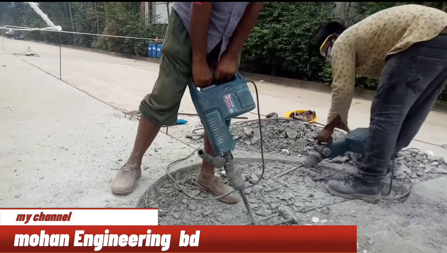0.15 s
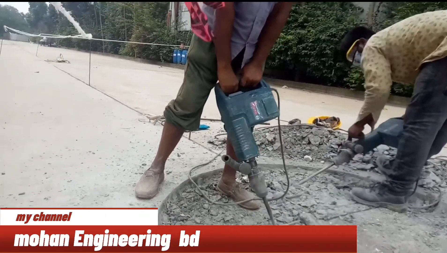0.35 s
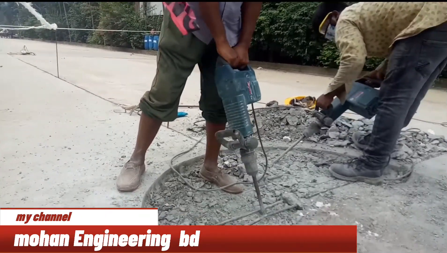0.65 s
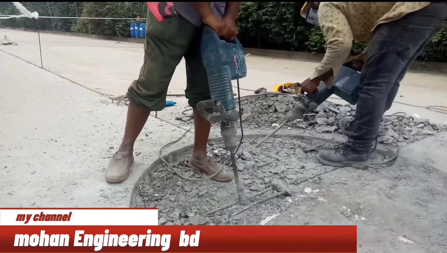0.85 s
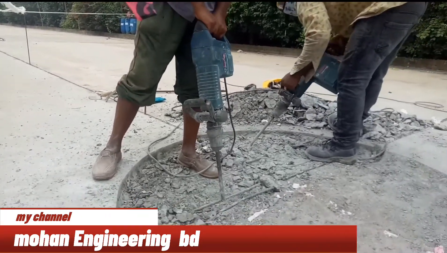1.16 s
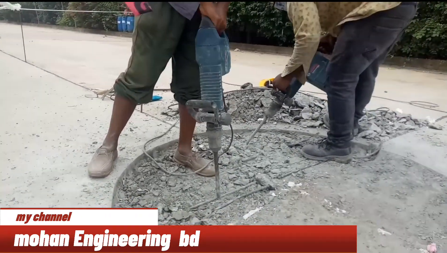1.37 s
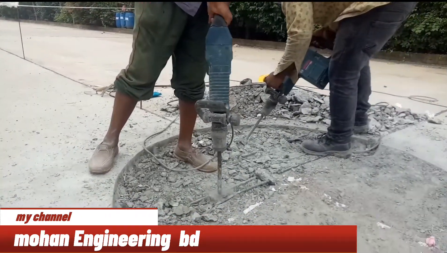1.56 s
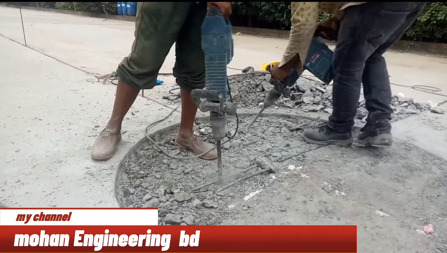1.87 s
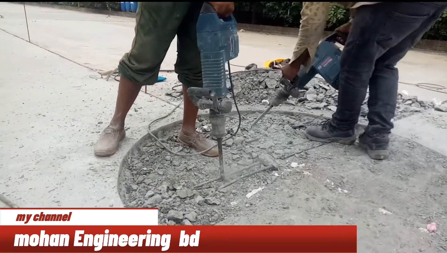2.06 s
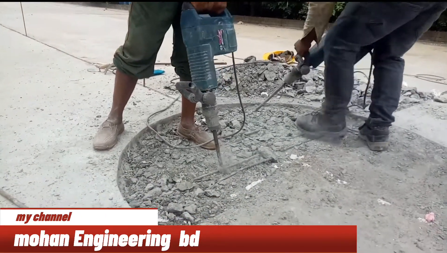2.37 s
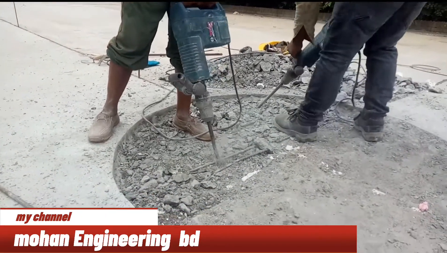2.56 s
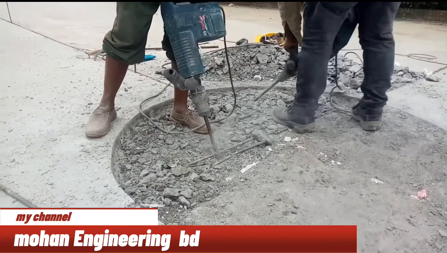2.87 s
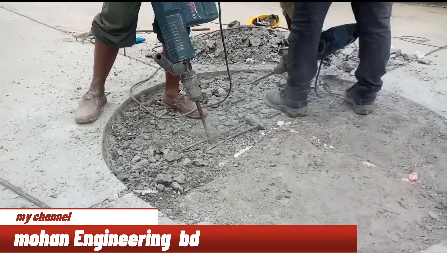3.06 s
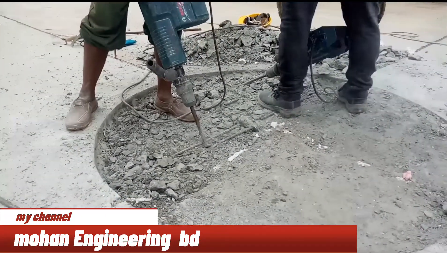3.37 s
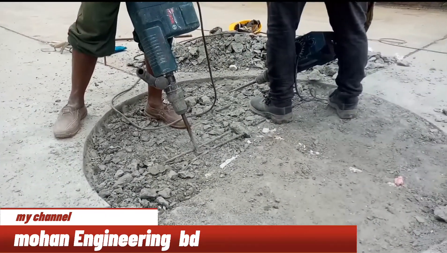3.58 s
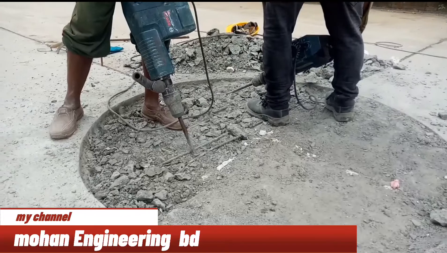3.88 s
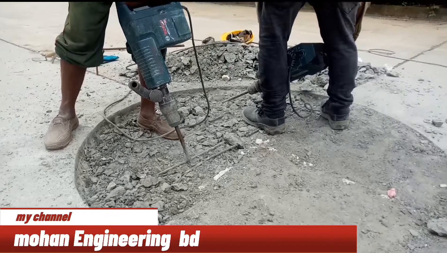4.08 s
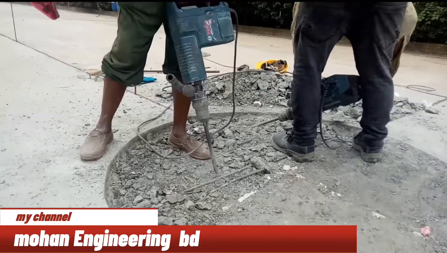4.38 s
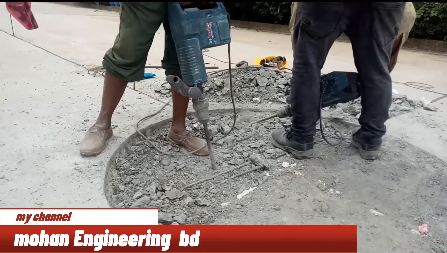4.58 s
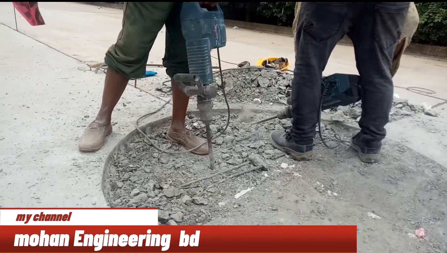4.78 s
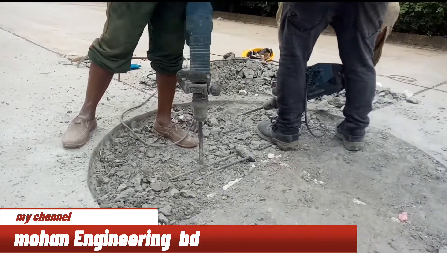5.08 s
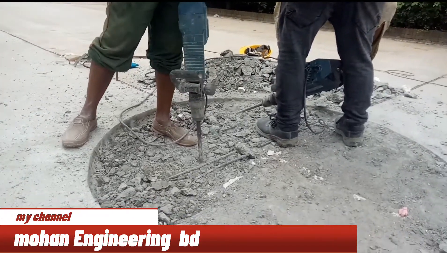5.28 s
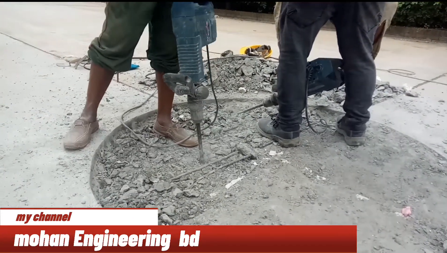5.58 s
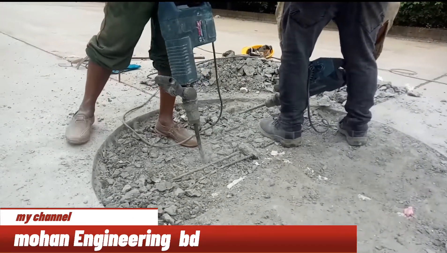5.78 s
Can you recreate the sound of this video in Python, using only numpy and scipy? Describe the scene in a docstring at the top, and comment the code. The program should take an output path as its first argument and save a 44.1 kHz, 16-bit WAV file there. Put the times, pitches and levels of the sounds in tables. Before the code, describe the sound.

A close demolition hammer pounds a concrete road about thirty times a second under a hard gear whine, while a second hammer rattles farther off.

```python
"""Close gear whine and hard blows: a demolition hammer chisels a concrete road, a second one works farther off.
Each crank turn squeezes the air spring and loads the gears, so their teeth whine (harmonics of the mesh pitch).
Each blow rings slab and chisel modes; noise bursts make grit cracks and casing sizzle. Lifted, blows are faint.
Behind: a loose chisel's high rings, motor and fan noise, brush tone, deep rumble, short echo of the hammers.
Two unequal microphone ports, the left mostly louder, clip at full scale."""
import sys
import numpy as np
from scipy import signal
from scipy.fft import rfft, irfft, next_fast_len
from scipy.io import wavfile
from scipy.ndimage import uniform_filter1d

SR = 44100
rng = np.random.default_rng(int(sys.argv[2]) if len(sys.argv) > 2 else 0)


def pcm_store(signal):
    """Save signal as 16-bit PCM."""
    levels = np.round(np.clip(np.atleast_2d(signal), -1, 1) * 32767)
    wavfile.write(sys.argv[1], SR, levels.astype(np.int16).T)


N = 261954
FFT_SIZE = next_fast_len(N)
RING_SCATTER_DB = 3.5


def undb(db):
    """Decibels to gain."""
    return 10 ** (np.asarray(db) / 20)


def level(x, db):
    """Scale to an rms level, fixed or moving."""
    return x * undb(db) / np.sqrt(np.mean(x ** 2))


def smooth_noise(size):
    """Slow random curve: white noise averaged over size samples."""
    return uniform_filter1d(rng.standard_normal(N), size=size)


def columns(table):
    """Each column of a time curve, sample by sample."""
    s, *rest = np.transpose(table)
    return [np.interp(np.arange(N) / SR, s, c) for c in rest]


def over_hz(table):
    """A frequency curve read at every transform bin, on a log axis."""
    hz, value = np.transpose(table)
    bins_hz = np.fft.rfftfreq(FFT_SIZE, 1 / SR)
    return np.interp(np.log(bins_hz + 1), np.log(hz), value)


def bouts(table, between_db, edge_s):
    """Levels that hold during each bout and fall back between bouts."""
    t = np.arange(N) / SR
    rest_db = np.array(between_db, float)[:, None]
    total_db = rest_db
    for start_s, end_s, *db in table:
        on = np.clip(np.minimum(t - start_s, end_s - t) / edge_s + .5, 0, 1)
        total_db = total_db + on * (np.array(db)[:, None] - rest_db)
    return total_db


def strokes(turns):
    """Number of the current turn, part of it done, and an impulse at each blow (every whole turn)."""
    count = columns(turns)[0]
    which = (count - count[0] // 1).astype(int)
    blows = np.diff(which, prepend=which[0]).astype(float)
    return which, count % 1, blows


def hump(turn, at, width, edge):
    """A swell once a turn; place and width in parts of a turn, higher edge flattens its top."""
    distance = (turn - at + .5) % 1 - .5
    return np.exp(-.5 * np.abs(distance / width) ** edge)


# Likeness of the noise at the two ports. Each row: frequency in Hz, correlation from -1 to 1.
PORT_LIKENESS = [(60, -0.036), (130, 0.98), (290, 0.48), (640, 0.82), (1410, 0.34), (3100, -0.21),
                 (6820, 0.95), (15000, 0.065)]


def noise(colour):
    """Coloured noise at 0 dB rms, built from sum and difference so port likeness varies with frequency."""
    like = np.clip(over_hz(PORT_LIKENESS), -1, 1)
    spectra = rfft(rng.standard_normal((2, FFT_SIZE))) * undb(over_hz(colour))
    mid, side = spectra * np.sqrt([1 + like, 1 - like])
    return level(irfft([mid + side, mid - side], FFT_SIZE)[:, :N], 0)


def ring(blows, which, modes, scatter_db, twist_rad):
    """Decaying resonances at 0 dB rms; each blow strikes each mode with its own strength and phase."""
    out = 0
    for hz, db, t60_s in modes:
        pole = np.exp(2j * np.pi * hz / SR - np.log(1000) / (t60_s * SR))
        chance = rng.standard_normal((N // 1000, 2))[which].T
        share = undb(scatter_db * chance[0]) * np.exp(1j * twist_rad * chance[1])
        mode = signal.lfilter([1], [1, -pole], blows * share).imag
        out = out + undb(db) * mode / np.sqrt(t60_s)
    return level(out, 0)


# Near crank, slope is motor speed. Each row: time in seconds, turns counted.
NEAR_TURNS = [(-0.1, -3.32), (0.7952, 24), (1.1786, 36), (1.9705, 60), (2.3611, 72), (2.8848, 88),
              (3.0176, 92), (3.408, 104), (4.1961, 128), (5.1033, 156), (5.2339, 160), (5.3677, 164),
              (6.1, 186.26)]
# Near gears, loud while the worker leans. Each row: time in seconds, tooth mesh pitch in Hz, level in dB.
NEAR_GEARS = [(0, 1861, -9.5), (.25, 1895, -12.5), (.5, 1890, -9.5), (.63, 1850, -7.5), (.73, 1844, -18.5),
              (.84, 1886, -28), (0.981, 1840, -29.5), (1.12, 1803, -26), (1.4, 1815, -24),
              (1.67, 1812, -32), (1.8, 1769, -23.5), (1.969, 1820, -15.5), (2.29, 1855, -8),
              (2.55, 1880, -12), (2.8, 1842, -11.5), (3.1, 1861, -10), (3.3, 1910, -10.5),
              (3.45, 1868, -10.5), (4.225, 1862, -12), (4.257, 1860, -36), (4.289, 1861, -12),
              (4.321, 1867, -23.5), (5.08, 1894, -20), (5.25, 1790, -19), (5.6, 1859, -14.5),
              (5.82, 1883, -8.5), (5.94, 1906, -13)]
# Near chiselling. Each row: start in seconds, end in seconds, thud in dB, crack in dB, chisel ring in dB.
NEAR_BOUTS = [(-.1, 0.76, -19, -25.5, -27.5), (1.555, 1.826, -26, -29.5, -19),
              (1.818, 2.139, -21, -23, -15.5), (2.14, 2.449, -22, -23, -20), (2.449, 2.74, -21, -25.5, -26),
              (2.74, 3.4, -22, -23, -45), (3.406, 4.245, -21, -26.5, -39), (4.278, 4.31, -48, -43, -11.5),
              (4.314, 4.747, -39, -43, -27), (4.75, 5.13, -39, -30, -34), (5.135, 5.459, -21.5, -25, -18.5),
              (5.46, 6.098, -20.5, -22, -35)]
NEAR_LIFTED_DB = (-39.5, -46, -32)  # thud, crack, chisel ring between bouts
# Near chisel modes. Each row: frequency in Hz, relative level in dB, t60 in seconds.
NEAR_CHISEL = [(3760, 0, .07), (3810, -3, .055), (4080, -9, .03), (4950, -16, .04)]
# Slab modes under the near hammer. Each row: frequency in Hz, relative level in dB, t60 in seconds.
NEAR_SLAB = [(128, -32, 0.1), (236, -4.5, 0.039), (322, 0, 0.007), (401, -5, 0.018), (672, -2, 0.019),
             (775, -13, 0.095), (1150, -6.5, 0.04)]


def near_hammer():
    """The main hammer: gears loaded by the air spring, chisel driven into the slab."""
    return hammer(NEAR_TURNS, NEAR_GEARS, NEAR_BOUTS, NEAR_LIFTED_DB, NEAR_CHISEL, NEAR_SLAB,
                  squeeze_at=0.855, rattle_db=-24.5)


# Far crank, slope is motor speed. Each row: time in seconds, turns counted.
FAR_TURNS = [(-0.1, -7.31), (0.5398, 13), (1.7836, 52), (2.1944, 65), (2.5951, 78), (3.0109, 91),
             (3.5803, 109), (3.9008, 119), (4.3732, 134), (4.5274, 139), (5.3174, 164), (6.1, 188.55)]
# Far gears. Each row: time in seconds, tooth mesh pitch in Hz, level in dB.
FAR_GEARS = [(0, 1920, -33), (1.3, 1922, -39), (1.501, 1924, -20), (1.9, 1925, -40), (2.9, 1942, -25),
             (3.5, 1930, -37), (3.9, 1921, -16), (4.9, 1922, -28), (5.5, 1908, -21), (5.94, 1887, -27)]
# Far chiselling. Each row: start in seconds, end in seconds, thud in dB, crack in dB, chisel ring in dB.
FAR_BOUTS = [(1.36, 1.564, -52, -58, -35.5), (1.555, 2.31, -44, -28, -40), (2.802, 3.401, -28.5, -34, -56),
             (3.4, 4.2, -32, -28, -31), (4.201, 5.051, -23, -26.5, -37), (5.05, 6.1, -24.5, -24.5, -53)]
FAR_LIFTED_DB = (-54, -50, -60)  # thud, crack, chisel ring between bouts
# Far chisel modes. Each row: frequency in Hz, relative level in dB, t60 in seconds.
FAR_CHISEL = [(7150, 0, .035), (7300, -2, .03), (7600, -6, .03)]
# Slab modes under the far hammer. Each row: frequency in Hz, relative level in dB, t60 in seconds.
FAR_SLAB = [(160.8, -10, 0.045), (590, -1.5, 0.0094), (1562, 8.5, 0.045)]


def far_hammer():
    """The same mechanism on its own crank, tilted to the right port."""
    far = hammer(FAR_TURNS, FAR_GEARS, FAR_BOUTS, FAR_LIFTED_DB, FAR_CHISEL, FAR_SLAB,
                 squeeze_at=0.807, rattle_db=-38)
    return far * undb([[-1.5], [1.5]])


def hammer(turns, gears, work, lifted_db, chisel, slab, squeeze_at, rattle_db):
    """Crank-locked sounds: whine and rattle at the squeeze, thud, crack, sizzle and ring at the blow."""
    thud_db, crack_db, ring_db = bouts(work, lifted_db, edge_s=0.027)
    which, turn, blows = strokes(turns)
    spread_db = [1.7, 1.1, 1.74, 2.4]  # turn to turn: whine, thud, crack, rattle and sizzle
    force = undb(rng.standard_normal((N // 1000, 4)) * spread_db)[which].T
    # the chisel bounces: weaker hits 2.9 and 6.1 ms after the blow
    bounces = blows + .5 * np.roll(blows, 130) + 0.075 * np.roll(blows, 270)
    chips = undb(level(smooth_noise(110), 9.5))  # stones break off in uneven spurts, 3 dB rms
    whine = gear_whine(turn, gears, squeeze_at, force[0])
    rattle = gear_rattle(turn, squeeze_at, force[3], rattle_db)
    thud = ring(bounces, which, slab, 1.6, 0.083) * force[1] * undb(thud_db)
    crack = grit_crack(turn, chips, force[2]) * undb(crack_db)
    sizzle = casing_sizzle(turn, chips, force[3]) * undb(crack_db)
    chisel_ring = ring(bounces, which, chisel, RING_SCATTER_DB, 1.74) * undb(ring_db)
    return whine + rattle + thud + crack + sizzle + chisel_ring


def gear_whine(turn, gears, squeeze_at, force):
    """Tooth-mesh harmonics, loaded by the squeeze; the return stroke loads the other flank in opposite phase."""
    mesh_hz, whine_db = columns(gears)
    # an unloaded hammer squeezes so lightly that both flanks whine about equally
    squeeze = undb(np.clip((whine_db + 19.0) * 2.5, -17, 0))
    since = turn - squeeze_at
    fading = undb(-14 * since)  # loudest as the teeth first bite
    drive = squeeze * force * fading * hump(turn, squeeze_at, 0.099, 3.58)
    back = 0.17 * hump(turn, squeeze_at + 0.41, 0.099, 1.76)
    wobble_rad = level(smooth_noise(300), -11)
    # the rotor slows under the squeeze, so each whine sags
    sag_rad = 22 * squeeze * since ** 2 * hump(turn, squeeze_at, 0.2044, 3.62)
    teeth_rad = 2 * np.pi * np.cumsum(mesh_hz) / SR + wobble_rad - sag_rad
    harmonics_db = (6.5, -10.5, -24.5, -31.0)
    tone = sum(undb(db) * np.sin(k * teeth_rad) for k, db in enumerate(harmonics_db, 1))
    whine = (drive - back) * tone
    local_rms = np.sqrt(uniform_filter1d(whine ** 2, size=2880))
    return whine / local_rms * undb(whine_db)


# Gear play noise. Each row: frequency in Hz, relative density in dB.
BACKLASH = [(1500, -1.5), (2600, -3), (3900, 19.5), (4700, -36), (5200, -63), (9000, -93.5)]


def gear_rattle(turn, squeeze_at, force, rattle_db):
    """Noise burst as the gears take up their play when the load sets in."""
    burst = hump(turn, squeeze_at - .13, 0.044, 1.5)
    return level(force * burst * noise(BACKLASH), rattle_db)


# Cracking concrete noise. Each row: frequency in Hz, relative density in dB.
GRIT = [(200, 8), (800, 13.5), (1300, 6), (2500, 6), (3900, 16.5), (4700, 8), (5300, 2), (7500, 0.5),
        (10000, -18), (15500, -20)]


def grit_crack(turn, chips, force):
    """Noise that jumps at the blow, decays in two stages, then shakes until the next blow."""
    decay = np.exp(-turn / 0.042) + 1.43 * np.exp(-turn / 0.11) + 0.11
    shake = uniform_filter1d(decay, size=170)  # onset softened over 4 ms
    return level(shake * chips * force * noise(GRIT), 7.67)


# Thin casing metal noise. Each row: frequency in Hz, relative density in dB.
CASING = [(3000, -34), (5500, -4), (8000, -3), (11000, -3), (15500, -7)]


def casing_sizzle(turn, chips, force):
    """Thin metal of the casing: treble noise that dies slowly over the turn."""
    decay = uniform_filter1d(np.exp(-turn / 0.32), size=260)
    return level(decay * chips * force * noise(CASING), -7.0)


# Near chisel loose in its hole. Each row: start in seconds, end in seconds, upper rings in dB, holder in dB.
LOOSE_BOUTS = [(-.1, .745, -49, -46), (1.6, 2.48, -29.5, -55), (2.48, 2.76, -49, -56),
               (2.76, 3.05, -48, -25), (3.05, 3.6, -54, -54), (3.6, 4.28, -53, -36), (5.14, 5.4, -29, -54),
               (5.4, 5.84, -30, -53), (5.84, 6.1, -44, -50)]
LOOSE_QUIET_DB = (-66, -54)  # upper rings, holder between bouts
# Upper chisel modes. Each row: frequency in Hz, relative level in dB, t60 in seconds.
CHISEL_TOP = [(6045, 1.5, .07), (8740, 0, .05), (8800, -3, .05), (11790, -9, .03), (14060, -5, .05),
              (15150, -4, .045)]
# Tool holder modes. Each row: frequency in Hz, relative level in dB, t60 in seconds.
HOLDER = [(7160, 0, .09), (7240, -3, .07)]


def loose_chisel():
    """High bending modes of the near chisel and modes of its holder, struck by every near blow."""
    which, _, blows = strokes(NEAR_TURNS)
    top_db, holder_db = bouts(LOOSE_BOUTS, LOOSE_QUIET_DB, edge_s=0.084)
    top = ring(blows, which, CHISEL_TOP, RING_SCATTER_DB, 3.2) * undb(top_db)
    holder = ring(blows, which, HOLDER, RING_SCATTER_DB, 1.0) * undb(holder_db)
    return top + holder


# Motors and fans. Each row: time in seconds, level in dB.
WHIR_LEVEL = [(0.0, -19), (.7, -17), (.85, -18), (1.37, -18.5), (1.75, -14.5), (1.95, -20), (2.22, -17.5),
              (2.88, -20), (3.21, -15), (5.29, -14), (5.67, -18.5), (5.94, -15)]
# Motor and fan noise. Each row: frequency in Hz, relative density in dB.
MOTOR = [(40, -44), (120, -11), (250, -9), (650, -7.5), (1150, -19), (1850, -1.5), (2220, -12),
         (2900, -7.5), (4030, -0.5), (4600, -6), (5000, -20.5), (8000, -32.5), (15500, -45)]
BRUSHES_HZ, BRUSHES_PEAK_DB = 4613, -40


def whir():
    """Motors and fans of both hammers: flickering noise, a lull in each near turn, a faint wavering brush tone."""
    flicker_db = level(smooth_noise(260), 6.3)
    lull_db = -4.0 * hump(strokes(NEAR_TURNS)[1], 0.49, 0.25, 2.8)
    fans = noise(MOTOR) * undb(columns(WHIR_LEVEL)[0] + flicker_db + lull_db)
    waver_rad = 0.5 * level(smooth_noise(3000), 0)
    brushes = undb(BRUSHES_PEAK_DB) * np.sin(2 * np.pi * BRUSHES_HZ * np.arange(N) / SR + waver_rad)
    return fans + brushes


# Deep noise. Each row: frequency in Hz, relative density in dB.
GROUND = [(24, -22), (45, -16), (100, 1), (150, 0), (210, -13), (400, -46)]
# Rumble swells. Each row: time in seconds, peak in dB before wander, width (standard deviation) in seconds.
SWELLS = [(.14, -23, 0.044), (.58, -18.5, .12), (1.74, -20, .04), (2.27, -25, .12), (4.17, -27, .05),
          (4.67, -29, 0.044), (5.75, -21.5, .04), (5.95, -15.5, 0.066)]
RUMBLE_DB, RUMBLE_WANDER_DB = -30.5, 1.4


def rumble():
    """Deep noise that wanders in level and swells now and then."""
    t = np.arange(N) / SR
    wander_db = RUMBLE_WANDER_DB * level(smooth_noise(4000), 0)
    swell_db = sum((db - RUMBLE_DB) * np.exp(-.5 * ((t - s) / width_s) ** 2) for s, db, width_s in SWELLS)
    return noise(GROUND) * undb(RUMBLE_DB + swell_db + wander_db)


def echo(dry):
    """Short echo off road and hedge: decaying noise as impulse response, t60 0.11 s, from 3 ms on."""
    t = np.arange(SR // 5) / SR
    tail = rng.standard_normal((2, len(t))) * undb(-60 * t / 0.11) * (t > .003)
    return undb(-35.5) * signal.fftconvolve(dry, tail, axes=1)[:, :N]


def scene():
    """Both hammers and the loose chisel with their echo, over whir and rumble."""
    dry = near_hammer() + loose_chisel() + far_hammer()
    return dry + echo(dry) + whir() + rumble()


# Port balance. Each row: frequency in Hz, left minus right in dB.
PORT_BALANCE = [(40, 12), (110, 8), (200, 7), (380, 7.5), (700, 9.5), (1290, 4.9), (1850, 7), (2600, 5),
                (4200, 11), (6000, 2.2), (8120, 1.1), (11000, 5), (15000, 11)]
# Right port drift as the device turns. Each row: time in seconds, gain in dB.
RIGHT_AIM = [(0, -1), (0.3, -2.3), (.7, -0.3), (1.1, -2.5), (2.0, 0.5), (3.03, 1.1), (3.41, -1.4),
             (4.45, -1.2), (5.3, -0.2), (5.94, -0.5)]
RIGHT_LEAD_S, BASS_CUT_HZ, TOP_HZ = 0.000035, 78.4, 15500


def record(dry):
    """Two unequal ports: two-pole bass cut, hard clip at full scale, steep top cut."""
    half_db = over_hz(PORT_BALANCE) / 2
    hz = np.fft.rfftfreq(FFT_SIZE, 1 / SR)
    left, right = undb(half_db), undb(-half_db)
    lead = np.exp(2j * np.pi * hz * RIGHT_LEAD_S)
    gain = np.array([left, right * lead]) * 2 / (left + right)
    bass_cut = (1j * hz / (1j * hz + BASS_CUT_HZ)) ** 2
    ports = irfft(rfft(dry, FFT_SIZE) * gain * bass_cut, FFT_SIZE)[:, :N]
    aim_db = [np.zeros(N), columns(RIGHT_AIM)[0]]
    clipped = np.clip(ports * undb(aim_db), -1, 1)
    top_cut = signal.ellip(10, .2, 50, TOP_HZ, fs=SR, output="sos")
    return signal.sosfilt(top_cut, clipped)


dry = scene()
out = record(dry)
pcm_store(out)
```